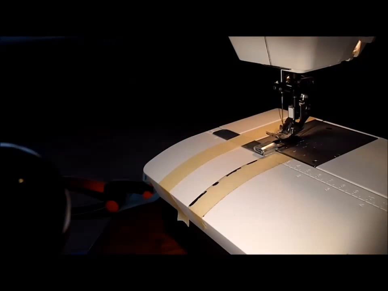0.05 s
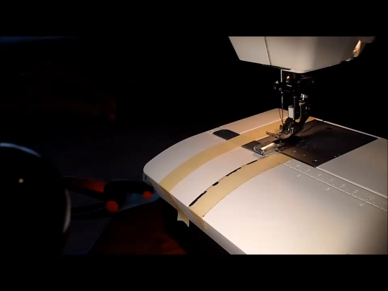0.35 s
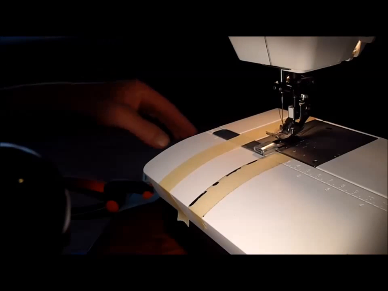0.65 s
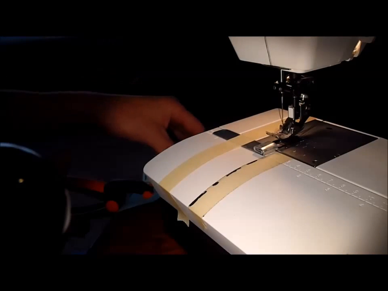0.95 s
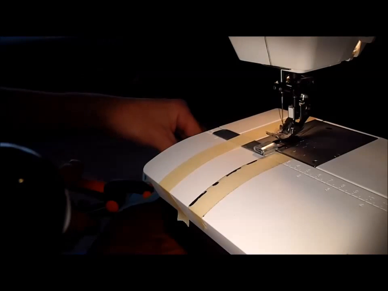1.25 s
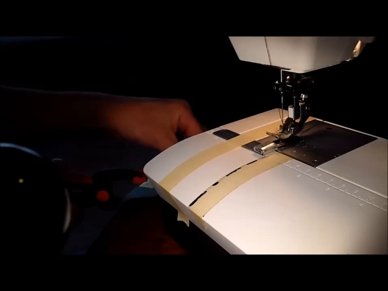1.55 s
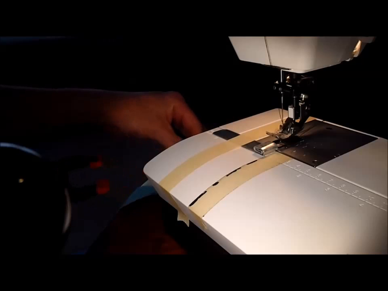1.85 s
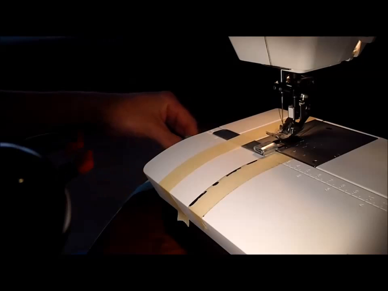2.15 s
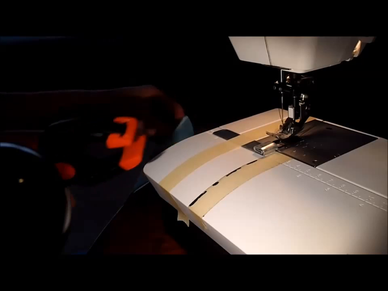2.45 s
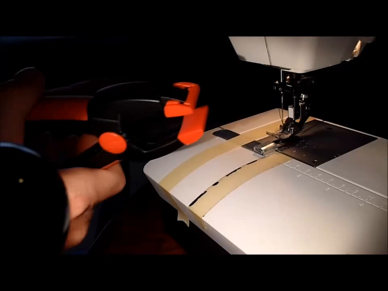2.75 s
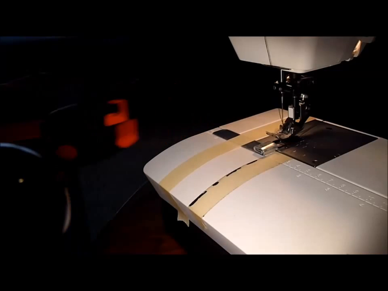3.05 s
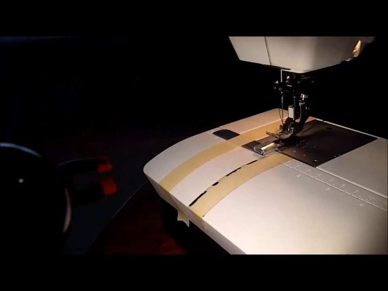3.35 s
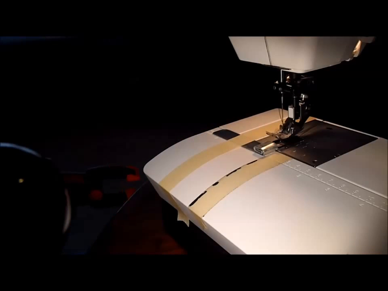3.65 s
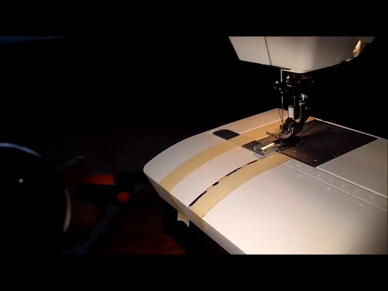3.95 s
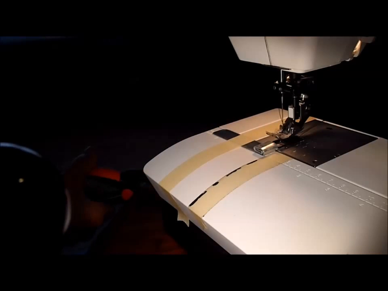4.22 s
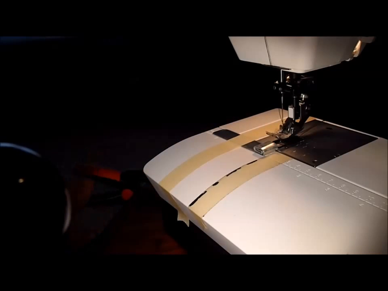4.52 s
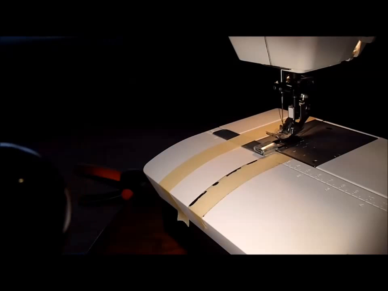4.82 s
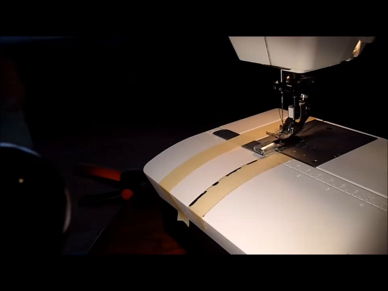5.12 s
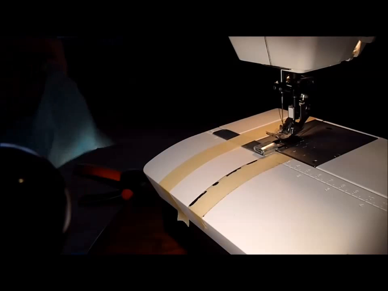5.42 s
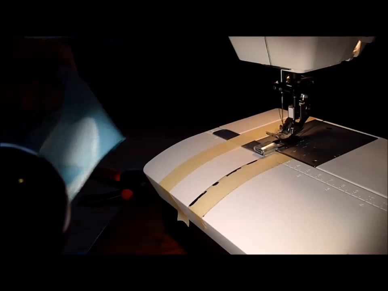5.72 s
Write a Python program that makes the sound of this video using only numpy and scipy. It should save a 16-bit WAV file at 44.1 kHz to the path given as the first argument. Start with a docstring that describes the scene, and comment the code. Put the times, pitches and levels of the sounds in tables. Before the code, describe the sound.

Low knocks on a wooden table, a plastic clamp dropping with a brief rattle, then sliding cloth, over faint fan noise.

```python
"""Clamp put down by an idle sewing machine

A quiet room, one camera microphone, a sewing machine standing idle on a wooden table. A hand bumps the
machine's bed and slides along it; a plastic clamp knocks twice, drops, rattles and settles. At the end
cloth is drawn close by. A fan whirs softly in the background and the camera's electronics buzz faintly."""
import sys
import numpy as np
from scipy import signal
from scipy.fft import rfft, irfft, next_fast_len
from scipy.io import wavfile
from scipy.ndimage import map_coordinates

SR = 44100
rng = np.random.default_rng(int(sys.argv[2]) if len(sys.argv) > 2 else 0)


def put_to_file(sound):
    """Save the sound as 16-bit audio at rate SR, in the file named by the first command-line argument."""
    columns = np.atleast_2d(sound).T  # one column per channel
    safe = np.clip(columns, -1, 1)
    whole_steps = np.round(safe * 32767)
    wavfile.write(sys.argv[1], SR, whole_steps.astype(np.int16))


N = 259289

# Modes of the table under the machine. Each row: frequency in Hz, level in dB, t60 in seconds.
TABLE_MODES = [(41.6, -13.5, 0.88), (74.6, -15.5, 0.38), (100.4, -13.5, 0.31), (124.1, -2.5, 0.32),
               (165, -11, 0.45), (208.7, -5.5, 0.31), (254.2, -2, 0.17), (297.4, -0.5, 0.14),
               (316.4, 0, 0.14), (356, -2.5, 0.1), (398, -5.5, 0.24), (459, -16, 0.15), (504, -15.5, 0.088),
               (614, -6, 0.14), (663, -14, 0.083), (760, -14.5, 0.12), (850, -4.5, 0.039),
               (890, -5.5, 0.08), (950, -20, 0.062), (1084, -12, 0.066), (1206, -12.5, 0.1),
               (1760, -13.5, 0.092)]
# The plastic's own ring. Each row: frequency in Hz, level in dB, t60 in seconds.
PLASTIC_MODES = [(3480, -9, 0.022), (3654, 5, 0.022), (4100, -3.5, 0.018)]


def table_knocks():
    """Blows ring the table; soft ones move mostly its deep modes, and lasting contact damps it."""
    # Each row: start in seconds, level in dB, contact corner in Hz (soft is low), share of the free t60.
    blows = [(0.670, -40, 102, 0.48), (0.8026, -30, 275, 0.74), (1.4134, -27, 260, 0.68),
             (1.691, -44, 199, 0.72), (3.606, -29, 415, 0.79), (3.8529, -26, 472, 0.43),
             (4.008, -23, 1300, 0.33), (4.0135, -21, 950, 0.36), (4.0315, -30.5, 430, 0.96),
             (4.085, -32, 620, 0.35), (4.0988, -27.5, 260, 0.31), (4.124, -34, 200, 0.5),
             (4.273, -32.5, 120, 0.9), (4.312, -33.5, 85, 0.5)]
    deep_hz, deep_db_per_octave, even_corner_hz = 190, 2.5, 380
    out = np.zeros(N)
    for start, db, corner_hz, ring_share in blows:
        deep_db = deep_db_per_octave * np.log2(even_corner_hz / corner_hz)
        modes = [(hz, level + deep_db / (1 + (hz / deep_hz) ** 4), t60 * ring_share)
                 for hz, level, t60 in TABLE_MODES]
        wood = ring(modes, scatter_db=3, phase_spread=1, attack_s=0.0019)
        thud = soften(wood, corner_hz, order=3)
        thud = low_cut(thud, 70, order=2)  # an open table top radiates long waves poorly
        thud = in_room(thud, wet_db=-11.5, delay_s=0.00583)
        add(out, start, amp(db) * thud / np.std(thud[:SR // 20]))
    return out


def plastic_clicks():
    """Hard plastic meets the table: a broad dry crack and a trace of ring."""
    # Each row: start in seconds, peak of the direct sound in dB, brightness corner in Hz.
    contacts = [(0.8026, -38.5, 4000), (3.8522, -31, 5000), (4.0078, -27.5, 3100), (4.079, -42, 4070),
                (4.0853, -34, 5470), (4.1458, -31, 3570)]
    # Colour of the crack. Each row: frequency in Hz, relative density in dB.
    crack_spectrum = [(500, -11), (1200, -4), (2000, 0), (2600, 1.5), (3100, -1.5), (3600, 10), (3900, -4),
                      (4400, -16), (5500, -7), (6500, -20.5), (9000, -37)]
    out = np.zeros(N)
    for start, db, corner_hz in contacts:
        shell = ring(PLASTIC_MODES, scatter_db=4, phase_spread=0.85, attack_s=0.00016)
        t = np.arange(len(shell)) / SR
        snap = amp(-60 * t / 0.0057) + amp(-6) * amp(-60 * t / 0.05)  # the impact, then a brief chatter
        crack = snap * noise(lambda hz: amp(along(crack_spectrum, hz)))[:len(t)]
        tick = soften(crack + amp(-26) * shell, corner_hz, order=4)
        add(out, start, amp(db) * in_room(tick / np.abs(tick).max(), wet_db=-12, delay_s=0.0033))
    return out


def sliding():
    """Fingers and cloth slide: tiny slips hiss and ring the plastic as each stroke swells and fades."""
    # Each row: start in seconds, length in seconds, hiss in dB, plastic ring in dB.
    strokes = [(1.355, 0.065, -58, -58), (1.383, 0.24, -68, -65), (1.523, 0.15, -59, -60),
               (3.198, 0.28, -64, -69.5), (3.594, .1, -69, -66), (4.959, 0.047, -57, -70),
               (5.172, 0.31, -59, -69), (5.43, 0.25, -56, -61), (5.646, 0.14, -52.5, -63),
               (5.761, 0.13, -50, -53.5)]
    # Colour of the friction. Each row: frequency in Hz, relative density in dB.
    hiss_spectrum = [(400, 0), (1000, 2.5), (1600, -9), (2200, -1), (3000, 0), (3700, -2), (4200, 0.5),
                     (4800, -7.5), (5500, -6.5), (6500, -16), (8000, -25.5), (12000, -44)]
    slips = rng.standard_normal(N) * amp(1.4 * wobble(500) + 0.85 * wobble(40))
    hiss = unit(filtered(slips, lambda hz: amp(along(hiss_spectrum, hz))))
    shell = ring(PLASTIC_MODES, scatter_db=1, phase_spread=1, attack_s=0.0002)
    scrape = unit(signal.fftconvolve(slips, shell)[:N])
    out = np.zeros(N)
    for start, length, hiss_db, ring_db in strokes:
        speed = np.zeros(N)
        add(speed, start, signal.windows.tukey(int(length * SR), 0.7))
        out += speed * (amp(hiss_db) * hiss + amp(ring_db) * scrape)
    return out


def table_rumble():
    """As weight bears on it, the table top rumbles softly and the table rocks on its legs."""
    # Each row: start in seconds, length in seconds, level in dB.
    pushes = [(0.68, 0.66, -50), (1.21, 0.22, -43.5), (4.01, 0.19, -42.5)]
    force = np.max([amp(db) * pressure(start, length) for start, length, db in pushes], axis=0)
    wood = ring(TABLE_MODES, scatter_db=-0.5, phase_spread=0.23, attack_s=0.0034)
    body = soften(wood, 75, order=1)
    tremor = rng.standard_normal(N) * amp(0.54 * wobble(23))
    rumble = unit(signal.fftconvolve(tremor, body)[:N])
    sway = amp(-3) * resonance(centre_hz=43, width_hz=5)
    return force * (rumble + sway)


def pressure(start, length):
    """One push: a quick rise, a hold, a quick release and a fainter shudder that fades slowly."""
    attack_s, release_s = 0.028, 0.045
    shudder_db, fade_db_per_s = -9.5, 10
    t = np.arange(N) / SR - start
    after = np.maximum(t - length, 0)
    release = np.maximum(np.exp(-after / release_s), amp(shudder_db - fade_db_per_s * after))
    return np.clip(t / attack_s, 0, 1) * release


def fan():
    """In the background, air noise and the hollow resonances of a fan housing, each wavering by itself."""
    # Fan and room air. Each row: frequency in Hz, relative density in dB.
    air_spectrum = [(15, -16.5), (40, -4.5), (150, -1), (300, -4), (580, -9), (900, -9.5), (1200, -13.5),
                    (1600, -16), (2200, -24.5), (3100, -21.5), (4300, -27.5), (6000, -38), (9000, -42),
                    (14000, -47.5)]
    # Each row: centre in Hz, width in Hz, level in dB, depth of the wavering in dB.
    housing_modes = [(763, 71, -59, 3), (1011, 52, -58.5, 2.5), (1310, 98, -61.5, 2), (1690, 57, -70.5, 2),
                     (3806, 49, -78, 2)]
    air = amp(-50 + 0.41 * wobble(5.23)) * noise(lambda hz: amp(along(air_spectrum, hz)))
    housing = sum(amp(db + depth_db * wobble(13)) * resonance(hz, width_hz)
                  for hz, width_hz, db, depth_db in housing_modes)
    return air + housing


def camera_buzz():
    """Right at the microphone, the electronics give a tiny high chirp thirty times a second."""
    chirps_per_s, whine_hz = 30, 5015
    t = np.arange(N) / SR
    from_chirp_s = ((t * chirps_per_s + 0.5) % 1 - 0.5) / chirps_per_s
    pulses = np.exp(-(from_chirp_s / 0.001) ** 2)
    whine = np.sin(2 * np.pi * whine_hz * t + 0.3 * wobble(71))
    return amp(-63) * pulses * whine


def in_room(x, wet_db, delay_s):
    """The direct sound reaches the microphone first, then the room's diffuse answer."""
    # Each row: frequency in Hz, the room's t60 in seconds.
    decay_times = [(60, 0.51), (200, 0.43), (1000, 0.29), (4000, 0.25), (10000, 0.18)]
    hz, t, spectra = signal.stft(rng.standard_normal(SR // 2), SR, nperseg=256)
    decay = amp(-60 * t / along(decay_times, hz)[:, None])
    tail = signal.istft(spectra * decay, SR, nperseg=256)[1]
    tail = np.pad(tail / np.linalg.norm(tail), (int(delay_s * SR), 0))
    return x + amp(wet_db) * signal.fftconvolve(x, tail)[:len(x)]


def ring(modes, scatter_db, phase_spread, attack_s):
    """Damped modes; each blow lands elsewhere and so finds them at new strengths."""
    hz, db, t60 = np.transpose(modes)[:, :, None]
    t = np.arange(int(0.7 * SR)) / SR
    strength, phase = rng.uniform(-1, 1, (2, len(hz), 1))
    envelopes = amp(db + scatter_db * strength - 60 * t / t60)
    waves = envelopes * np.sin(2 * np.pi * hz * t + phase_spread * phase)
    return waves.sum(axis=0) * (1 - np.exp(-t / attack_s))


def soften(x, hz, order):
    """A contact that lasts longer passes less treble."""
    return signal.sosfilt(signal.butter(order, min(hz, SR / 2.5), fs=SR, output="sos"), x)


def low_cut(x, hz, order):
    """Drop the deep bass."""
    return signal.sosfilt(signal.butter(order, hz, "highpass", fs=SR, output="sos"), x)


def resonance(centre_hz, width_hz):
    """Noise of rms 1 in one resonance."""
    return noise(lambda hz: 1 / (1 + ((hz - centre_hz) / width_hz) ** 2))


def noise(response):
    """Coloured noise of rms 1."""
    return unit(filtered(rng.standard_normal(N), response))


def filtered(x, response):
    """Shape x by a gain that depends on frequency."""
    size = next_fast_len(N + SR // 2)
    return irfft(rfft(x, size) * response(np.fft.rfftfreq(size, 1 / SR)), size)[:N]


def wobble(rate):
    """A smooth random curve, rate knots a second."""
    knots = rng.standard_normal(int(N * rate / SR) + 4)
    return map_coordinates(knots, [np.arange(N) * rate / SR])


def along(points, hz):
    """Read (Hz, value) points on a log frequency axis."""
    point_hz, values = np.transpose(points)
    return np.interp(np.log(hz + 1), np.log(point_hz), values)


def add(track, start_s, sound):
    """Mix a sound into the track."""
    part = track[round(start_s * SR):][:len(sound)]
    part += sound[:len(part)]


def amp(db):
    """Decibels to gain."""
    return 10 ** (np.asarray(db) / 20)


def unit(x):
    """Scale to rms 1."""
    return x / np.sqrt(np.mean(x ** 2) + 1e-20)


def scene():
    """All sources at the one microphone."""
    return (table_knocks() + plastic_clicks() + sliding() + table_rumble() + fan() + camera_buzz())[None]


def record(dry):
    """The camera drops the deepest bass and keeps nothing above its band limit."""
    bottom_hz, top_hz = 29, 14100
    return filtered(low_cut(dry[0], bottom_hz, order=4), lambda hz: hz < top_hz)[None]


dry = scene()
out = record(dry)
put_to_file(out)
```